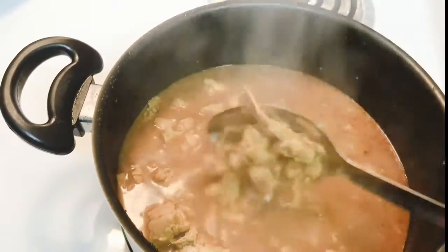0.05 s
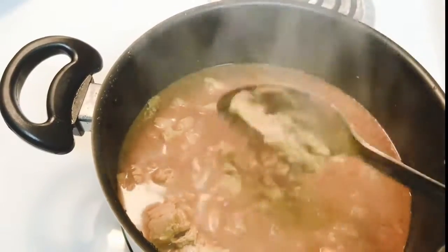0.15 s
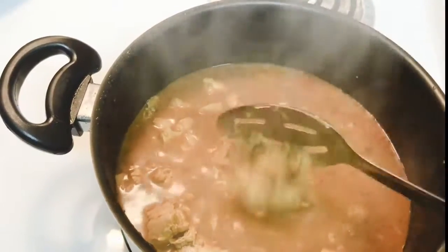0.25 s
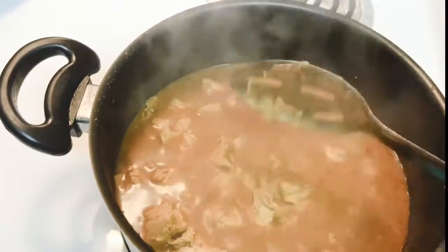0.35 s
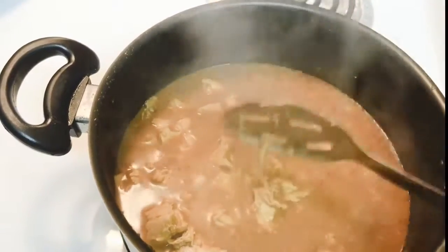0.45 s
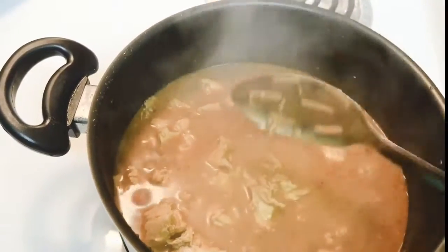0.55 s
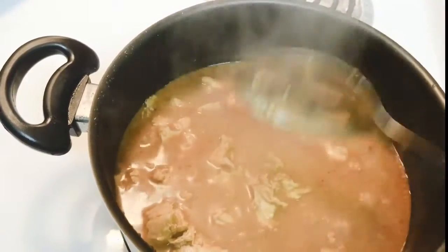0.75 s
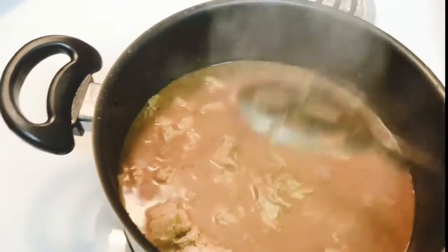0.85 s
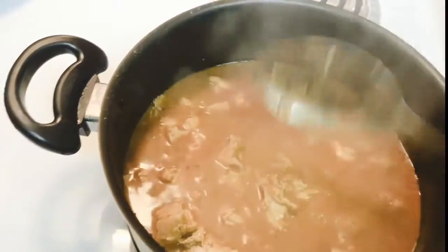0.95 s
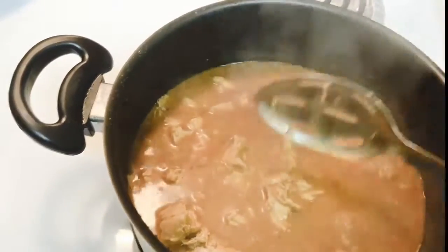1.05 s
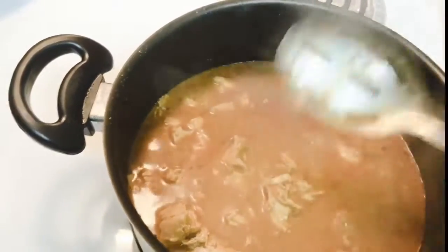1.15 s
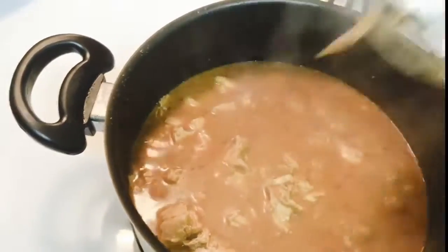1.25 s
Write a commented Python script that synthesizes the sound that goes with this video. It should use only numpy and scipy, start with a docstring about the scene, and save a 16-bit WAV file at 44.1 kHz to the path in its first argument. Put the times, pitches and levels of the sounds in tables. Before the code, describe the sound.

A spoon knocks five times on the rim of a pot of simmering sauce.

```python
"""Spoon knocks on a saucepot

A slotted spoon is knocked five times on the rim of a pot of thick sauce, close by in a small kitchen.
Each knock is a hard crack, a short clack of the spoon and a damped ring of the full pot; the walls
answer. Underneath, the sauce simmers with small pops over the low rumble of the stove."""
import sys
import numpy as np
from scipy import signal
from scipy.fft import rfft, irfft, next_fast_len
from scipy.io import wavfile

SR = 44100
rng = np.random.default_rng(int(sys.argv[2]) if len(sys.argv) > 2 else 0)


def pcm_store(signal):
    """Save signal as 16-bit PCM."""
    levels = np.round(np.clip(np.atleast_2d(signal), -1, 1) * 32767)
    wavfile.write(sys.argv[1], SR, levels.astype(np.int16).T)


N = 57330

# decay of the kitchen's tail (frequency [Hz], t60 [s])
WALL_DECAY = [(100, 0.73), (250, 0.19), (600, 0.58), (1400, 0.41), (4000, 0.33), (14000, 0.2)]
# tone of that tail (frequency [Hz], level [dB])
WALL_EQ = [(60, 8.5), (150, 7.5), (300, 11.5), (550, -16), (850, 5.5), (1300, -10.5), (2200, -9),
           (3500, -8.5), (8000, -9.5), (14000, -16)]
# stove rumble and steam hiss (frequency [Hz], level [dB])
STOVE_EQ = [(15, -31), (25, 5.5), (76, 12), (161, -7.5), (212, -7), (317, 1), (503, -5), (754, 2),
            (962, -6.5), (1610, -3.5), (2280, -10.5), (2990, -9), (4030, -11), (12500, -14.5),
            (16000, -20.5)]
# the clearest bubbles bursting in the sauce (time [s], starting pitch [Hz], level [dB])
BUBBLE_POPS = [(.072, 725, -30.5), (.922, 1000, -25), (0.972, 1210, -34), (1.066, 3333, -31),
               (1.285, 895, -26.5)]
# light touches of the spoon (time [s], level [dB])
TICK_CUES = [(0.1338, -25.5), (0.3184, -29.5)]
# tone of a touch (frequency [Hz], level [dB])
TICK_EQ = [(500, -17), (2000, -3), (3500, 0.5), (8000, -6), (13000, 0.5), (16000, 2)]
# rattle and echoes inside the pot after a blow (frequency [Hz], level [dB])
CHATTER_EQ = [(300, 1.5), (950, 12), (1300, 11.5), (2000, 5), (3300, -9), (4800, -6), (6500, -6),
              (9000, -8.5), (14000, -24), (16000, -12)]
# the ring of the full pot, with low resonances of hob and room (frequency [Hz], level [dB], t60 [s])
RING_MODES = [(110.3, -50.5, 1), (148.5, -34.5, 0.39), (187.5, -52.5, 0.68), (266.5, -29, 0.19),
              (337.2, -40.5, 0.25), (570, -36, 0.087), (621, -28.5, 0.074), (843, -46.5, 0.35),
              (1108, -36, 0.28), (1183, -40, 0.27), (1226, -30.5, 0.17), (1402, -28.5, 0.17),
              (1580, -41.5, 0.23), (1863, -45, 0.24)]
# gaps where the pot does not radiate (frequency [Hz], width [Hz])
POT_NOTCHES = [(432, 70), (920, 74)]
# the clack of spoon on rim (frequency [Hz], level [dB], t60 [s])
CLACK_MODES = [(262, -16, 0.013), (557, -13.5, 0.036), (710, -39, 0.09), (1174, -18.5, 0.032),
               (1269, -6.5, 0.022), (1673, -18, 0.025), (1867, -22, 0.049), (2314, -12, 0.021),
               (3380, -22, 0.021), (3963, -22.5, 0.023), (7000, -25, 0.014)]
# tone of the hard contact (frequency [Hz], level [dB])
CRACK_EQ = [(300, -48), (1000, -29), (1800, 4), (2600, -4), (3700, 2.5), (4900, -11.5), (6300, 2),
            (7600, -6.5), (10000, 0), (11300, -5.5), (14000, 1), (15500, -11.5), (17000, -4)]
# blows on the rim (time [s], level [dB], crack and chatter [dB], ring [dB], rim ping [dB],
# clack tilt [dB/octave], midrange boost [dB], bite [dB], bounce [dB])
KNOCK_CUES = [(0.2257, -1, 1.5, -3.5, -15, -1, 0, -1, -8), (0.4324, 0, 1, 1.5, -11, -0.33, 4, 1, -7.5),
              (0.6034, -2, -3, 0, 5.5, -.5, 2.5, 3.5, -3.5), (0.8066, 1, -3.5, 2, 14.5, 0.74, 6, 6, -2.5),
              (1.0017, -1, 2, 1.5, 5, -1, 0, 4.5, -2.5)]


def amp(db):
    """Decibels to gain."""
    return 10 ** (np.asarray(db) / 20)


def unit(x):
    """Scale to an rms of 1."""
    return x / np.sqrt(np.mean(x ** 2) + 1e-20)


def along(points, hz):
    """Read a (frequency, value) curve on a log frequency axis."""
    freqs, values = np.transpose(points)
    return np.interp(np.log(hz + 1), np.log(freqs + 1), values)


def bell(hz, centre_hz, octaves):
    """A bell curve over pitch, 1 at its centre."""
    return np.exp(-(np.log2(hz / centre_hz) / octaves) ** 2)


def clock():
    """Seconds since the start of one event."""
    return np.arange(SR * 3 // 4) / SR


def add(track, start, x):
    """Mix x into the track at a start time in seconds."""
    i = max(round(start * SR), 0)
    track[i:i + len(x)] += x[:N - i]


def noise(eq, size, grit=0):
    """Coloured noise of rms 1; grit makes it spiky."""
    white = rng.standard_normal(size) * np.exp(grit * rng.standard_normal(size))
    gain = amp(along(eq, np.fft.rfftfreq(size, 1 / SR)))
    return unit(irfft(rfft(white) * gain, size))


def fade(t, t60):
    """Exponential decay from t = 0, silent before."""
    return (t >= 0) * np.exp(-np.log(1000) * np.abs(t) / t60)


def kitchen(x, send_db=0):
    """The direct sound plus quick echoes off the hob and a tail from the walls."""
    t = clock()
    early = rng.standard_normal(len(t)) * fade(t - 0.013, t60=0.026)
    hz, frame_times, bands = signal.stft(rng.standard_normal(len(t)), SR, nperseg=256)
    t60 = along(WALL_DECAY, hz)[:, None]
    gain = amp(along(WALL_EQ, hz))[:, None] * np.sqrt(2 * np.log(1000) / (t60 * SR))
    tail = signal.istft(bands * gain * fade(frame_times, t60), SR, nperseg=256)[1][:len(t)]
    tail *= t > 0.0025  # pre-delay
    response = amp(-15.5) * early / np.linalg.norm(early) + amp(-2) * tail
    return x + signal.fftconvolve(amp(send_db) * x, response)[:len(x)]


def stove():
    """A steady bed of stove rumble and faint steam."""
    return amp(-50.5) * noise(STOVE_EQ, N)


def simmer():
    """Bubbles burst as short rising notes, a few clear ones among many faint ones."""
    out, t = np.zeros(N), clock()[:SR // 20]
    pops_per_s, glide = 70, 5.1
    faint = [(rng.uniform(0, N / SR), 960 * np.exp(0.46 * rng.normal()), -40.5 + 3 * rng.normal())
             for _ in range(int(pops_per_s * N / SR))]
    envelope = fade(t, t60=0.0094) * (1 - np.exp(-t / 0.001))
    for start, hz, db in BUBBLE_POPS + faint:
        add(out, start, amp(db) * envelope * np.sin(2 * np.pi * hz * t * (1 + glide * t)))
    return out


def spoon_ticks():
    """The spoon touches lightly as it is emptied."""
    out, t = np.zeros(N), clock()
    for start, db in TICK_CUES:
        add(out, start, amp(db) * noise(TICK_EQ, len(t)) * fade(t, t60=0.009))
    return out


def hollow(x):
    """The shell's antiresonances cut narrow gaps between its modes."""
    for hz, width_hz in POT_NOTCHES:
        x = signal.lfilter(*signal.iirnotch(hz, hz / width_hz, SR), x)
    return x


def ring(modes, attack_s=0.001, tilt_db=0, mid_db=0):
    """Damped modes of one blow; the point of contact tilts them and favours a narrow mid band."""
    t, out = clock(), 0
    mid_hz, scatter_db = 1320, 3.5
    for hz, db, t60 in modes:
        contact_db = tilt_db * np.log2(hz / mid_hz) + mid_db * bell(hz, mid_hz, octaves=0.17)
        gain = amp(db + contact_db + scatter_db * rng.normal())
        out = out + gain * fade(t, t60) * np.sin(2 * np.pi * hz * t)
    return out * (1 - np.exp(-t / attack_s))


def crack(bite_db):
    """The gritty instant of contact, at constant energy; an edge-on blow adds treble bite."""
    t = clock()
    eq = [(hz, db + bite_db * bell(hz, 5940, octaves=1)) for hz, db in CRACK_EQ]
    envelope = fade(t, t60=0.013)
    burst = noise(eq, len(t), grit=0.33) * envelope
    return unit(burst) * np.sqrt(np.mean(envelope ** 2))


def knocks():
    """Each blow cracks, bounces, clacks, chatters briefly and leaves pot, hob and room ringing."""
    out, t = np.zeros(N), clock()
    bounce_s, body_lag_s = 0.0047, 0.0005
    ping_hz, ping_t60 = 7016, 0.12  # the rim's thin high mode
    for start, db, crack_db, ring_db, ping_db, tilt_db, mid_db, bite_db, bounce_db in KNOCK_CUES:
        contacts = crack(bite_db) + amp(bounce_db) * np.roll(crack(bite_db), round(bounce_s * SR))
        chatter = amp(-22.5) * noise(CHATTER_EQ, len(t)) * fade(t - 0.006, t60=0.11)
        clack = ring(CLACK_MODES, tilt_db=tilt_db, mid_db=mid_db)
        ringing = amp(ring_db) * ring(RING_MODES, attack_s=0.0014, mid_db=mid_db)
        ping = ring([(ping_hz, ping_db - 31.5, ping_t60)])
        transient = kitchen(amp(-10) * contacts) + chatter
        body = kitchen(clack, send_db=-4) + ringing + ping
        add(out, start, amp(db + crack_db) * transient)
        add(out, start + body_lag_s, amp(db) * body)
    return out


def scene():
    """Mono mix: knocks up front, ticks, simmer and stove behind."""
    return (hollow(knocks()) + kitchen(spoon_ticks() + simmer()) + stove())[None]


def record(dry):
    """The microphone drops the deep bass and keeps nothing above its band limit."""
    low_cut_hz, top_hz, edge_hz = 49, 15850, 500
    x = signal.sosfilt(signal.butter(3, low_cut_hz, "highpass", fs=SR, output="sos"), dry)
    size = next_fast_len(N + SR // 4)
    high_cut = np.clip(0.5 + (top_hz - np.fft.rfftfreq(size, 1 / SR)) / edge_hz, 0, 1)
    return irfft(rfft(x, size) * high_cut, size)[:, :N]


dry = scene()
out = record(dry)
pcm_store(out)
```